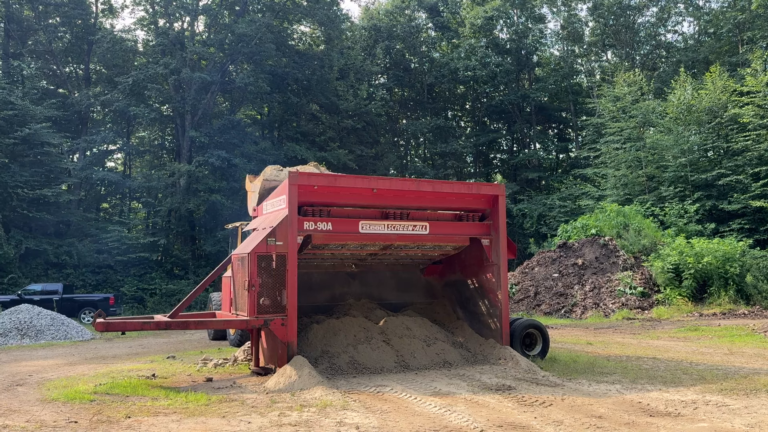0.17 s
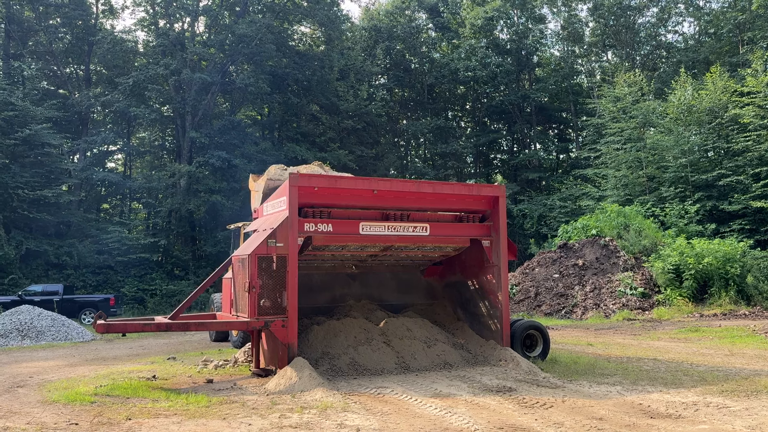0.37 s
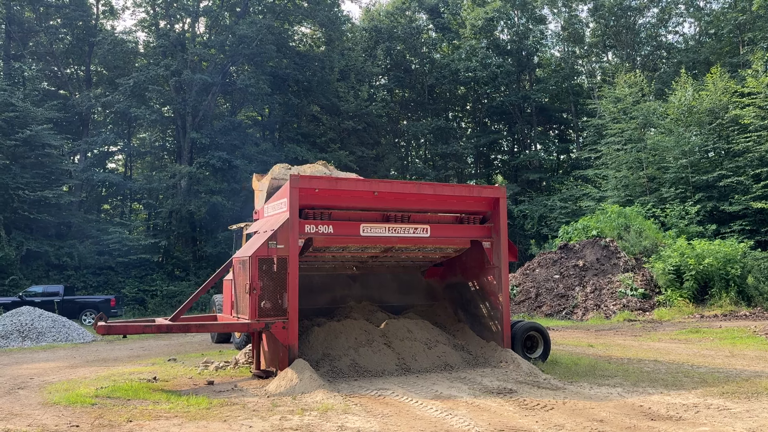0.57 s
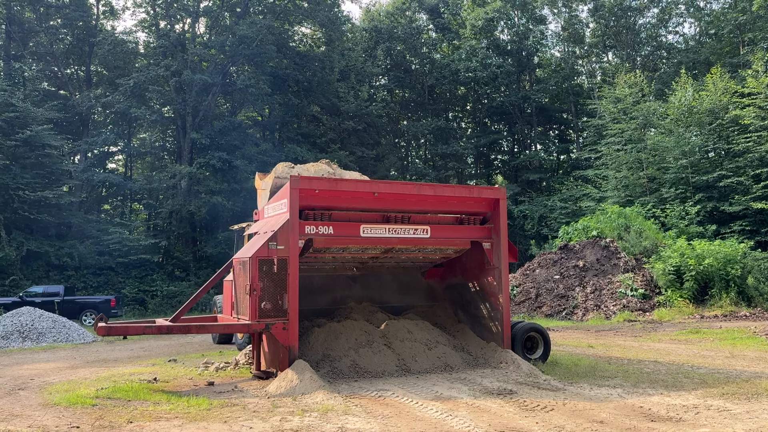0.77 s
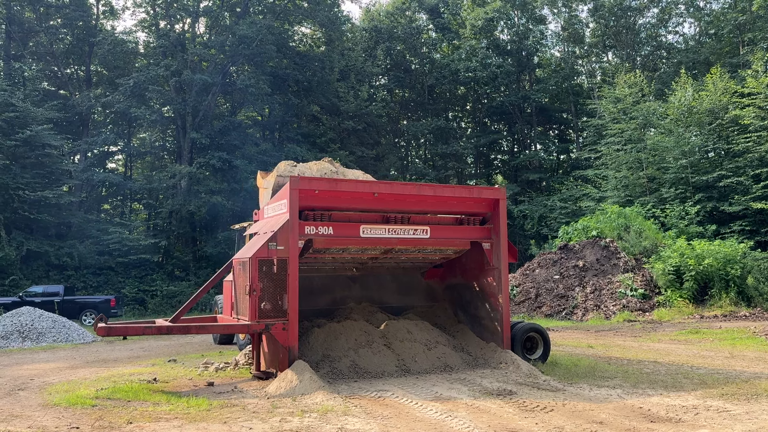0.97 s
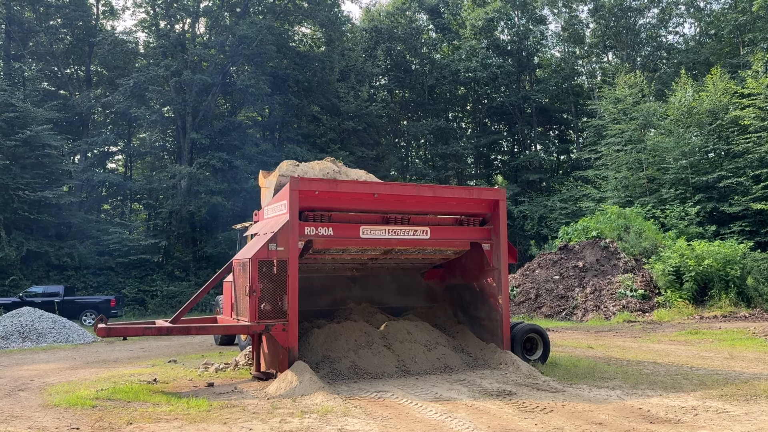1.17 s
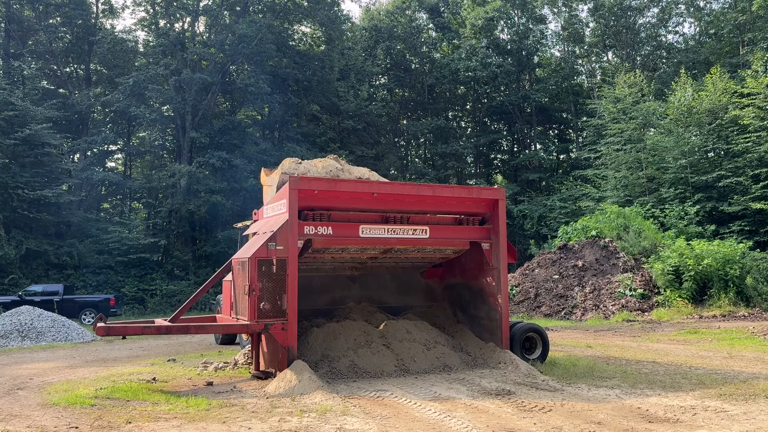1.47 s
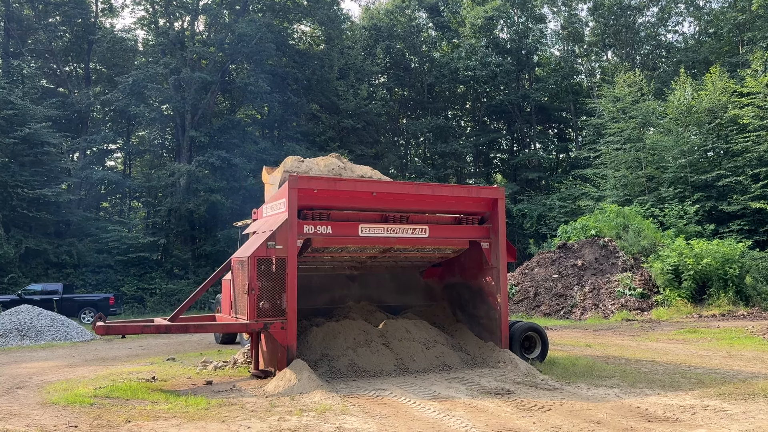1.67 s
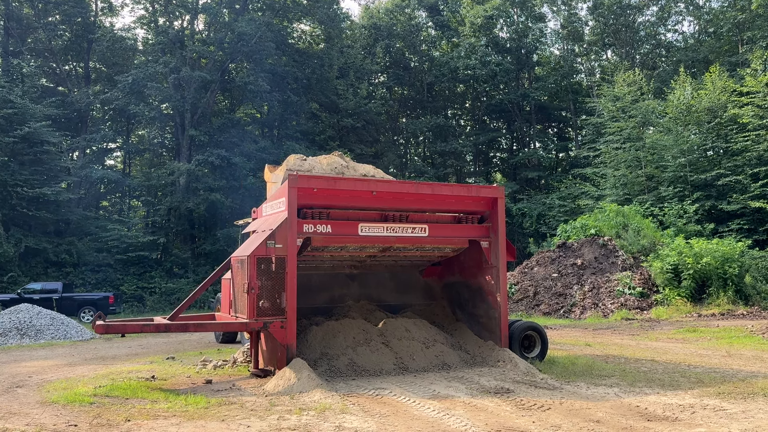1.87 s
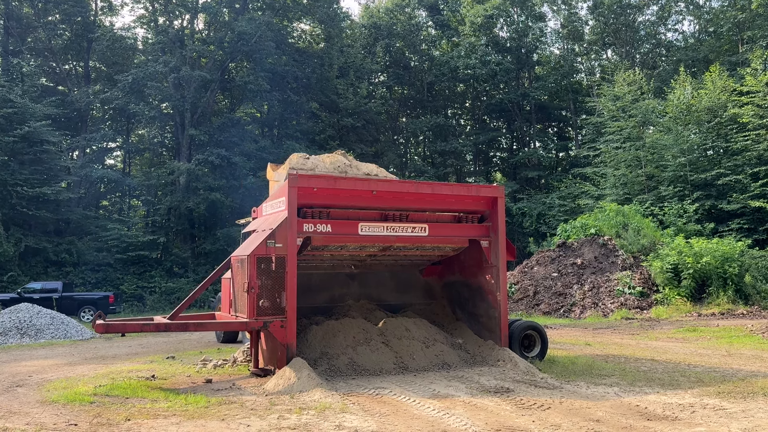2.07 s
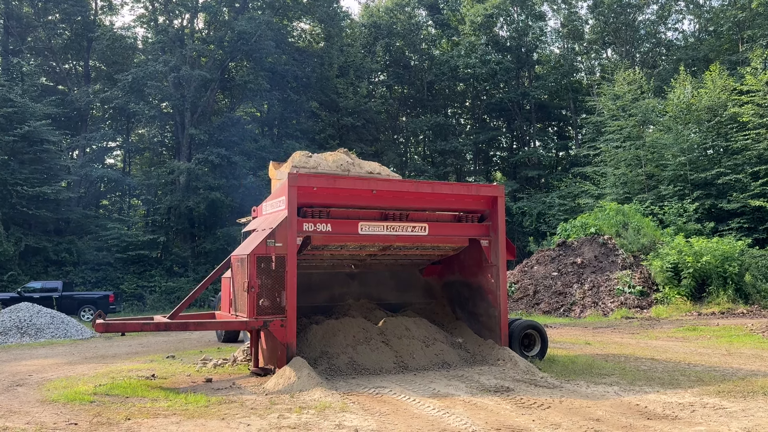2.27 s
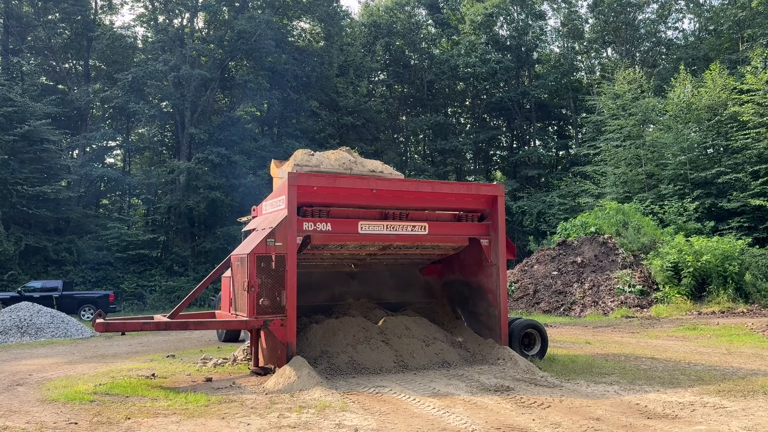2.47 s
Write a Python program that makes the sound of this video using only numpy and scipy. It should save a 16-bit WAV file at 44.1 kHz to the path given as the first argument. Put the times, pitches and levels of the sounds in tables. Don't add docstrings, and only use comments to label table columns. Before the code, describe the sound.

A diesel-driven vibrating soil screen roars steadily, soil hissing and stones rattling on its mesh.

```python
import sys
import numpy as np
from scipy import signal
from scipy.fft import rfft, irfft, next_fast_len
from scipy.io import wavfile
from scipy.ndimage import uniform_filter1d

SR = 44100
rng = np.random.default_rng(int(sys.argv[2]) if len(sys.argv) > 2 else 0)


def ratio(d):
    e = np.asarray(d, float) / 20
    return 10 ** e


def dump_mix(stems):
    frames = np.atleast_2d(stems).T
    limited = np.clip(frames, -1, 1)
    pcm = np.round(limited * 32767).astype(np.int16)
    wavfile.write(sys.argv[1], SR, pcm)


N = 115101

# (frequency [Hz], density [dB per Hz])
SOIL_SPECTRUM = [(700, -12), (1500, 0), (2500, -6), (4300, -10), (5200, -16), (13600, -20), (14100, -25),
                 (15400, -27)]


def rms_one(x):
    return x / np.sqrt(np.mean(x ** 2) + 1e-20)


def at_hz(points, hz):
    table_hz, value = np.array(points).T
    return np.interp(np.log(hz + 1), np.log(table_hz), value)


def drift(rate):
    r = np.exp(-80 * np.pi * rate / SR)
    white = rng.standard_normal(N // 40 + 2002)
    slow = signal.lfilter([1], [1, -2 * r, r * r], white)[2000:]
    return np.interp(np.arange(N) / 40, np.arange(len(slow)), rms_one(slow - slow.mean()))


def throw(lag_s=0):
    screen_hz, throw_s = 18.6, .035
    return 2 * np.pi * screen_hz * (np.arange(N) / SR - throw_s - lag_s)


def tone(angle, db):
    return ratio(db) * np.sqrt(2) * np.cos(angle)


def flickering(spectrum, patchy_db, shared_db):
    # (resonance [Hz], width [Hz], boost [dB])
    panels = [(776, 190, 3.5), (1133, 150, 3.5), (1420, 60, 1), (1924, 70, 5.5), (4550, 450, 4),
              (2975, 390, -4.5), (16900, 130, -19)]
    size = next_fast_len(N)
    hz = np.fft.rfftfreq(size, 1 / SR)
    colour = at_hz(spectrum, hz)
    for f, width, db in panels:
        colour = colour + db / (1 + (2 * (hz - f) / width) ** 2)
    noise = rfft(rng.standard_normal((3, size))) * ratio(colour) * (hz > .8 * spectrum[0][0])
    place = 1.5 * np.log2(hz / 130 + 1e-9)
    out = 0
    for k in range(12):
        band = np.cos(np.pi / 2 * np.clip(place - k, -1, 1)) ** 2
        flicker = ratio(patchy_db * (drift(14) + 1.2 * drift(46)))
        out = out + irfft(noise * band, size)[:, :N] * flicker
    return rms_one(out * ratio(shared_db))


def exhaust(turn):
    # (multiple of the engine cycle, level [dB rms])
    orders = [(3, -31), (4, -46), (5, -44), (6, -41), (7, -36), (8, -36), (9, -36), (10, -47), (11, -47),
              (12, -42), (13, -47), (14, -54), (15, -53), (16, -50), (17, -48), (18, -43), (20, -45),
              (22, -45), (24, -52), (26, -49)]
    family_lag = [4.85, 1.65, 5.1]
    out = 0
    for k, db in orders:
        locked = db > -43 and k < 13
        lag = family_lag[k % 3] if locked else rng.uniform(0, 7)
        out = out + tone(k * turn - lag, db + .4 * drift(3.0))
    return out


def whine(turn):
    # (multiple of the engine cycle, level [dB rms])
    meshes = [(34, -47.5), (40, -43), (42, -53.5), (47, -37.5), (48, -43.5), (51, -41), (69, -45.5),
              (71, -42), (72, -39), (75, -36.5), (78, -42.5), (82, -40.5)]
    wobble_db, out = 2.5, 0
    for k, db in meshes:
        angle = round(k) * turn + rng.uniform(0, 7.05) + .5 * drift(1.9)
        out = out + tone(angle, db + wobble_db * drift(5.5))
    return out


def engine():
    cycle_hz, first_firing_s, hunt_cycles = 15.9, .0549, .002
    t = np.arange(N) / SR
    turn = 2 * np.pi * (cycle_hz * (t - first_firing_s) + hunt_cycles * drift(1.78))
    return exhaust(turn) + whine(turn)


def frame():
    # (multiple of the screen turn, level [dB rms])
    harmonics = [(3, -59), (4, -45), (8, -40), (9, -47), (11, -50), (13, -52), (15, -49), (17, -49),
                 (25, -50)]
    return sum(tone(k * throw() + rng.uniform(0, 7), db + .6 * drift(3.0)) for k, db in harmonics)


def belt():
    # (frequency [Hz], level [dB rms])
    hums = [(82.2, -49), (87.9, -48)]
    t = np.arange(N) / SR
    return sum(tone(2 * np.pi * hz * t, db + drift(2.5)) for hz, db in hums)


def fan():
    # (time [s], frequency [Hz])
    fan_speed = [(0, 38.2), (.9, 38.1), (1.1, 37.5), (2.61, 37.55)]
    mark_s, mark_angle = 1.19, 5.52
    t = np.arange(N) / SR
    angle = 2 * np.pi * np.cumsum(np.interp(t, *np.transpose(fan_speed))) / SR
    angle = angle - angle[int(mark_s * SR)] + mark_angle
    return tone(angle, -40) - tone(2 * angle, -44)


def rumble():
    # (frequency [Hz], density [dB per Hz])
    rumble_spectrum = [(40, -16), (75, -5), (125, -8), (170, 0), (210, -6)]
    hz = np.fft.rfftfreq(N, 1 / SR)
    inside = (hz > 30) & (hz < rumble_spectrum[-1][0])
    noise = rfft(rng.standard_normal((3, N))) * ratio(at_hz(rumble_spectrum, hz)) * inside
    return ratio(-39) * rms_one(irfft(noise, N))


def roar(load):
    # (frequency [Hz], density [dB per Hz])
    roar_spectrum = [(200, -0.5), (240, -7.5), (400, -2), (800, -2), (1300, -3.5), (2300, -11), (2900, -25)]
    throb_db = 0.4 * np.cos(throw()) + 0.74 * load
    return ratio(-25) * flickering(roar_spectrum, 1.07, throb_db)


def soil(load):
    throb_db = 1.62 * np.cos(throw()) + 0.86 * np.cos(2 * throw(0.0041)) + 0.29 * load
    return ratio(-27.5) * flickering(SOIL_SPECTRUM, 1, throb_db)


def stones():
    stones_per_s, ring_cycles, throb_db = 900, 28, 7.5
    bunching_db = throb_db * np.cos(throw()) + 1.5 * slams() + 1.5 * drift(7.0)
    born = rng.random(N) < stones_per_s * ratio(bunching_db) / SR
    weight = ratio(1.6 * np.minimum(rng.exponential(1, N), 4))
    impacts = born * weight * rng.choice([-1, 1], N)
    mode, out = rng.integers(0, 24, N), 0
    for k, hz in enumerate(np.geomspace(500, 7000, 24)):
        r, w = ratio(-60 * hz / (ring_cycles * SR)), 2 * np.pi * hz / SR
        resonator = [0, np.sin(w)], [1, -2 * r * np.cos(w), r * r]
        ring = signal.lfilter(*resonator, impacts * (mode == k) + 1e-18)
        out = out + ratio(at_hz(SOIL_SPECTRUM, hz)) * ring
    return ratio(-34.5) * rms_one(out)


def slams():
    # (time [s], peak level [dB])
    clods = [(0.038, -11.5), (0.243, -10.5), (0.296, -13.5), (0.404, -11.5), (0.62, -13.5), (0.832, -11.5),
             (0.932, -12.5), (1.049, -11.5), (1.162, -13), (1.314, -14), (1.371, -13), (1.58, -13),
             (1.699, -12), (1.739, -13.5), (1.857, -10), (1.917, -14), (2.127, -10), (2.234, -13),
             (2.303, -11.5), (2.449, -9.5), (2.561, -14.5)]
    rise_s, rest_db, share = 0.0064, -14, 1.22
    s, db = np.transpose(clods)
    hits, r = np.zeros(N), np.exp(-1 / (rise_s * SR))
    hits[(s * SR).astype(int)] = share * np.clip(db - rest_db, 0, 9)
    return signal.lfilter([0, np.e * (1 - r)], [1, -2 * r, r * r], hits + 1e-18)


def ticks():
    # (time [s], peak level [dB])
    strikes = [(0.4004, -20), (0.7714, -30), (0.8325, -32), (1.0504, -25), (1.1414, -29), (1.333, -17.5),
               (1.3714, -38), (1.6994, -26), (1.8594, -37), (1.9174, -24), (1.9734, -19.5), (2.1294, -30),
               (2.3094, -19), (2.3754, -22), (2.4274, -27), (2.4844, -43)]
    t60_s, level_db, contrast = .08, -5, 1.6
    hits = np.zeros(N)
    for s, db in strikes:
        hits[int(s * SR)] = ratio(level_db - 24 + contrast * (db + 20.5))
    r = ratio(-60 / (t60_s * SR))
    contact = uniform_filter1d(hits, size=150) * 150 * .02
    shape = signal.lfilter([1], [1, -r], contact + 1e-18)
    shape = shape * hits.max() / shape.max()
    treble = signal.butter(2, 8000, "high", fs=SR, output="sos")
    return shape * signal.sosfilt(treble, rng.standard_normal(N))


def ports(direct, scattered):
    # (frequency [Hz], likeness [0-1])
    likeness = [(50, .9998), (200, .986), (500, .955), (2000, .83), (2900, .74), (7100, .6), (7900, .91),
                (12500, .965)]
    # (frequency [Hz], phase [radians])
    right_lead = [(1700, 0), (3100, -1.1), (3600, -0.04), (5300, -0.67), (6300, 0.95), (7050, 0.67),
                  (7600, 0.08)]
    # (frequency [Hz], level difference [dB])
    balance = [(60, 0.26), (500, -1.17), (1800, -1.7), (2800, -1.2), (3400, 2), (4300, 0), (6000, -2.4),
               (7200, 1.5), (8200, 0)]
    knee_hz, lag_s = 7950, 1 / 3150
    hz = np.fft.rfftfreq(N, 1 / SR)
    lead = at_hz(right_lead, hz) + 2 * np.pi * lag_s * np.maximum(hz - knee_hz, 0)
    alike = np.clip(at_hz(likeness, hz), 0, 1)
    side = np.array([[1], [-1]])
    pair = np.sqrt(alike) * rfft(direct) * np.exp(-.5j * side * lead)
    pair = pair + np.sqrt(1 - alike) * rfft(scattered)
    return irfft(pair * ratio(.5 * side * at_hz(balance, hz)), N)


def scene():
    load = 0.39 * drift(2.6) + slams()
    noise = rumble() + roar(load) + soil(load)
    hard = engine() + frame() + belt() + fan() + stones() + ticks()
    echo = np.array([np.roll(hard, 431), np.roll(hard, 613)])
    return ports(noise[0] + hard, noise[1:] + echo)


def top_cut(x):
    return signal.sosfilt(signal.butter(12, 15810, fs=SR, output="sos"), x)


def record(dry):
    start_s, cutoff_hz = .0363, 15760
    hz = np.fft.rfftfreq(N, 1 / SR)
    mix = irfft(rfft(dry) * (hz < cutoff_hz), N)
    mix = mix * (np.arange(N) >= start_s * SR)
    return top_cut(mix)


dry = scene()
out = record(dry)
dump_mix(out)
```